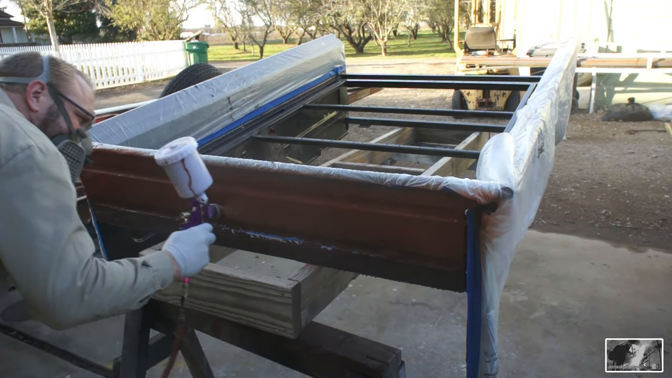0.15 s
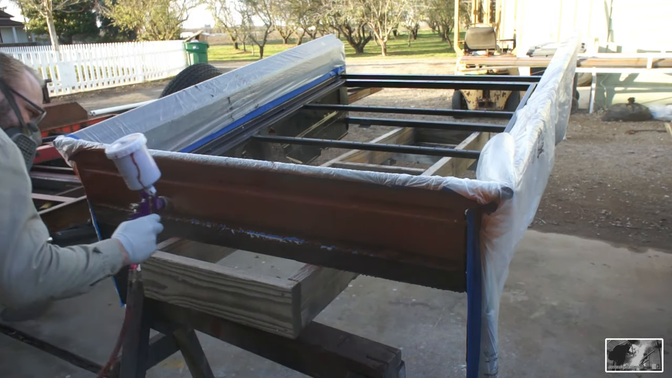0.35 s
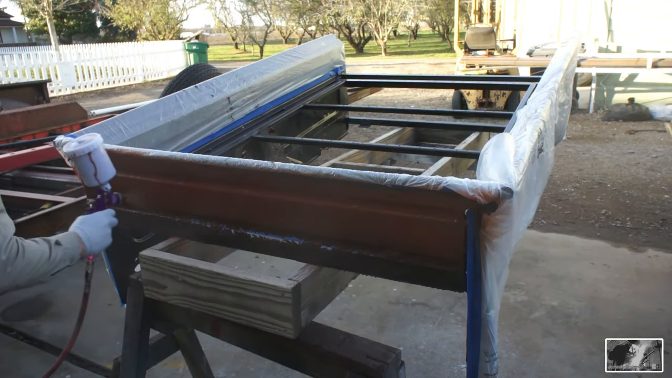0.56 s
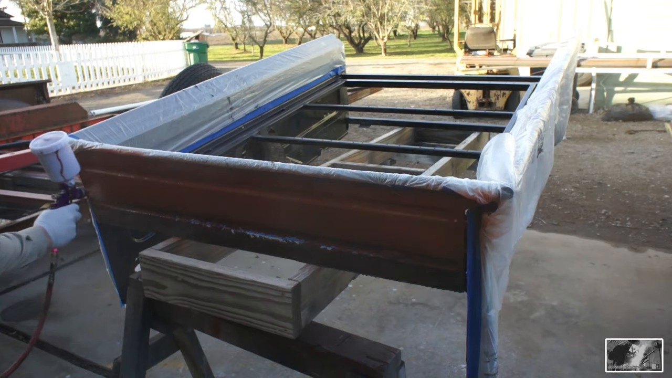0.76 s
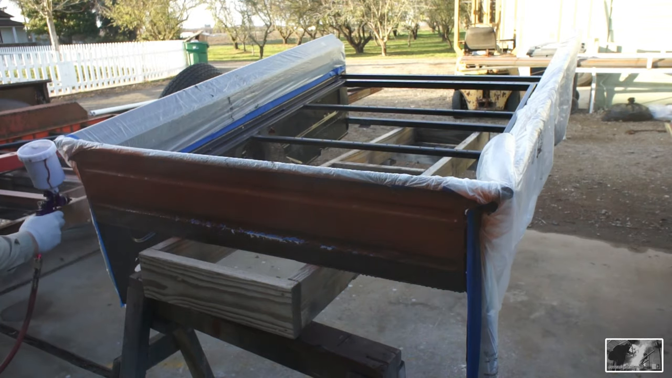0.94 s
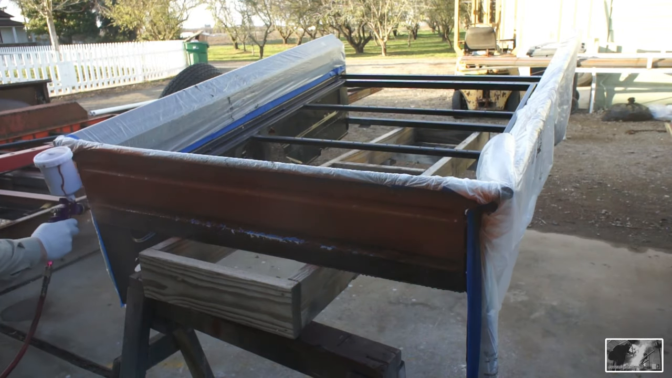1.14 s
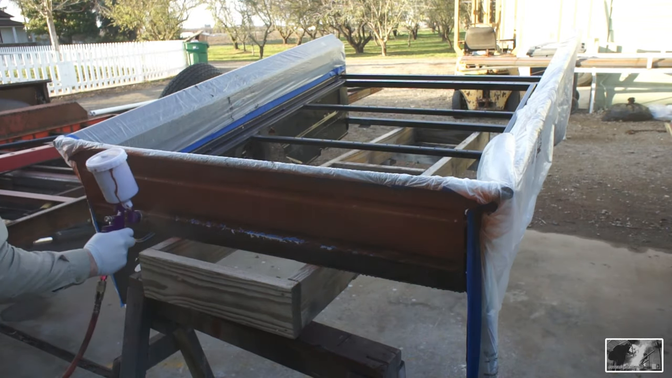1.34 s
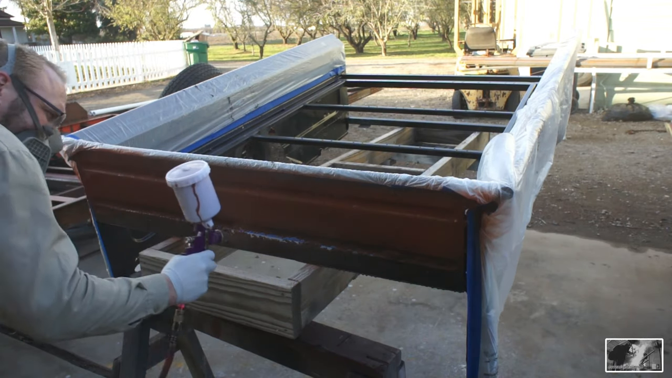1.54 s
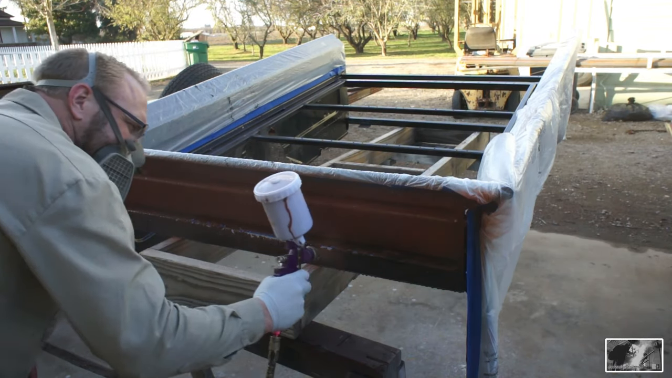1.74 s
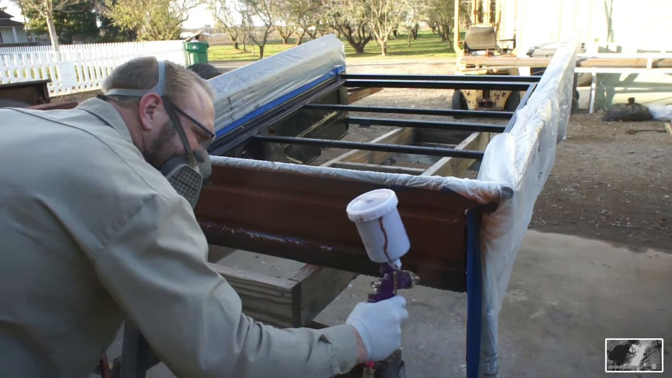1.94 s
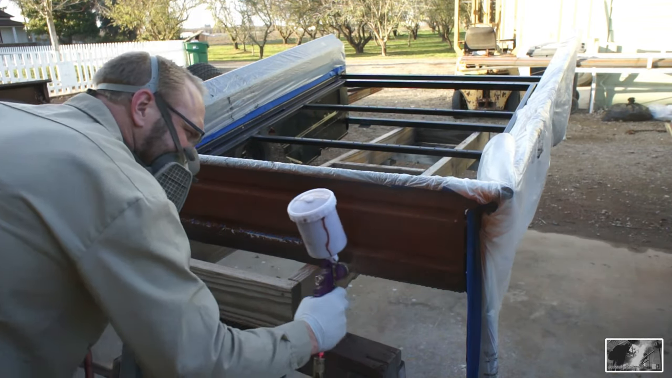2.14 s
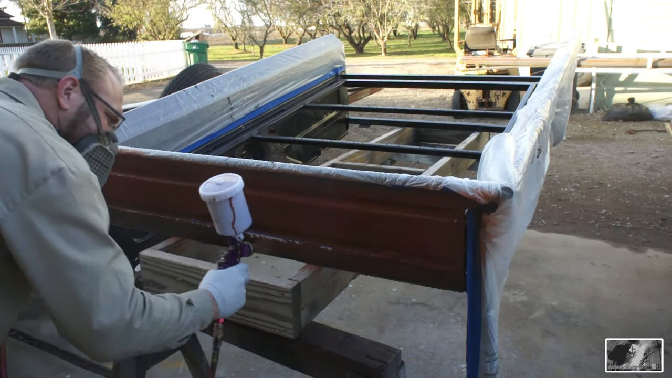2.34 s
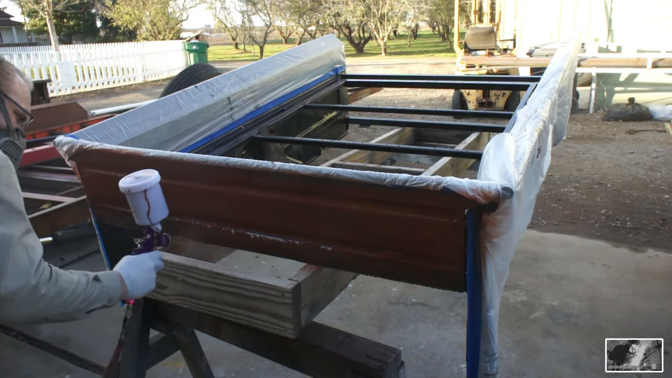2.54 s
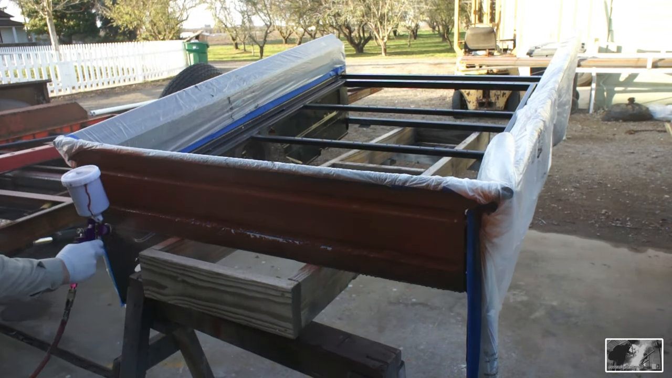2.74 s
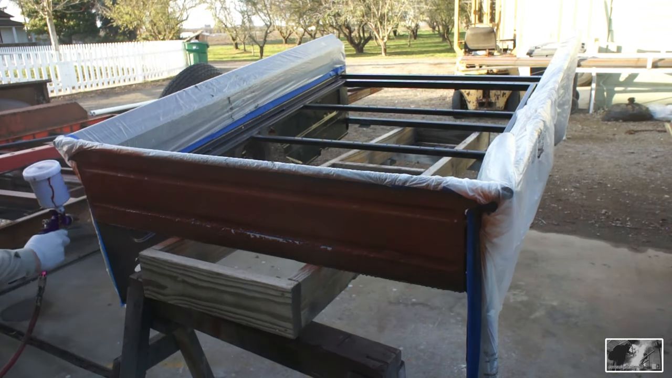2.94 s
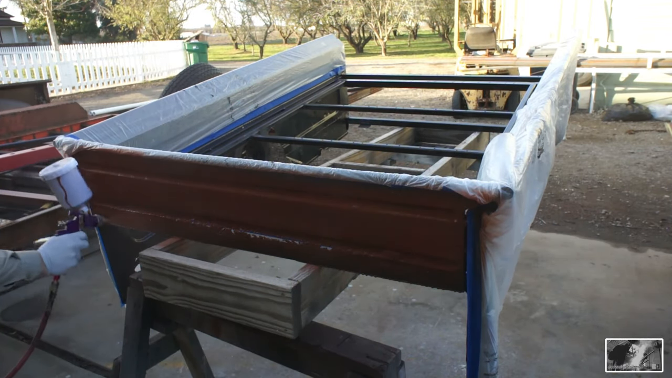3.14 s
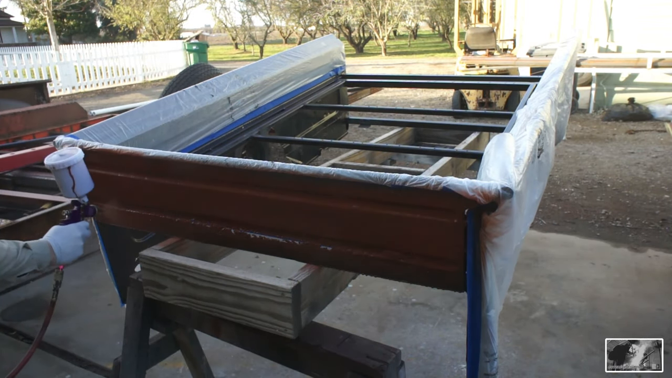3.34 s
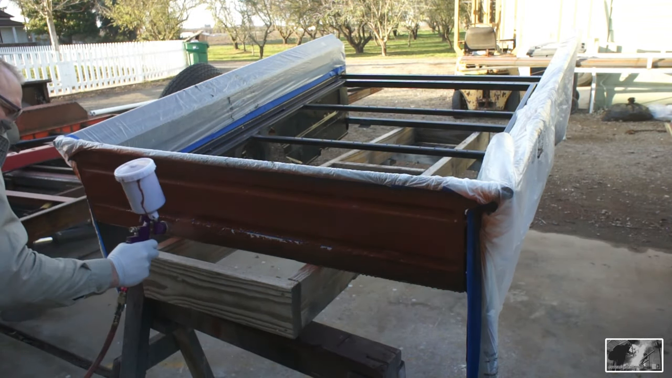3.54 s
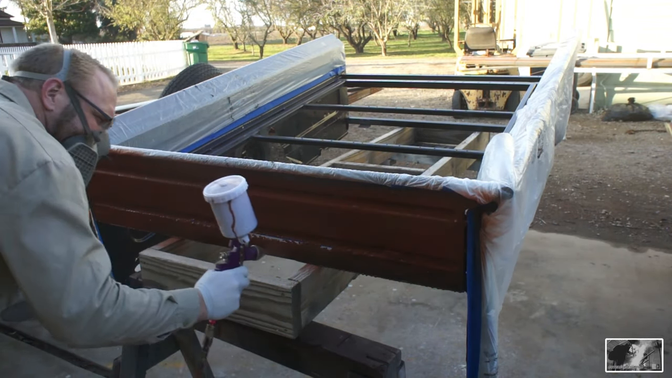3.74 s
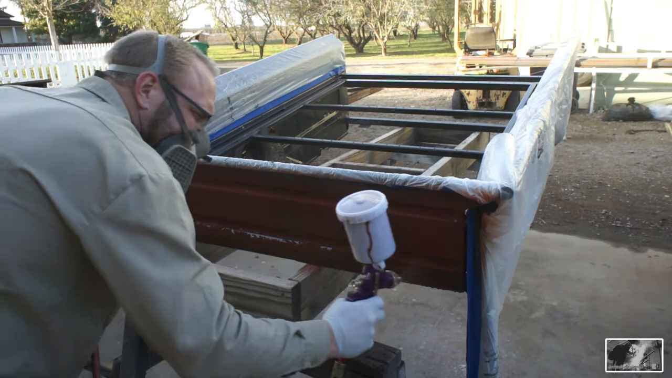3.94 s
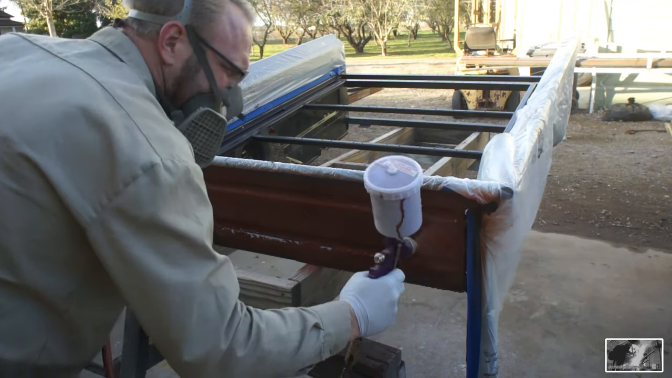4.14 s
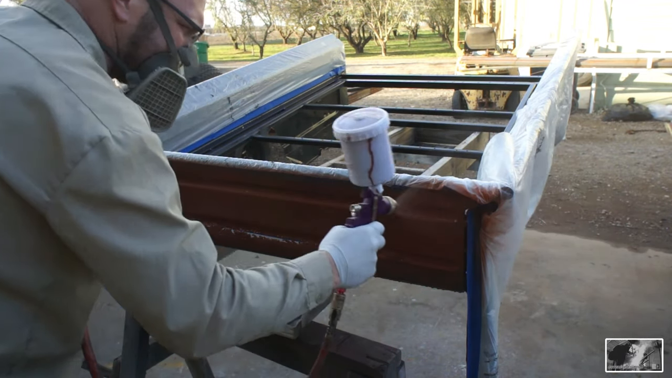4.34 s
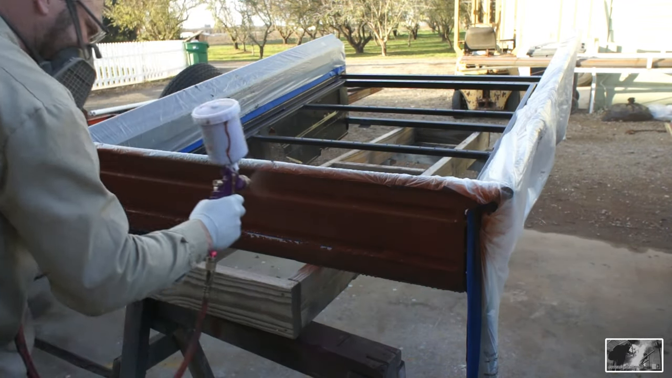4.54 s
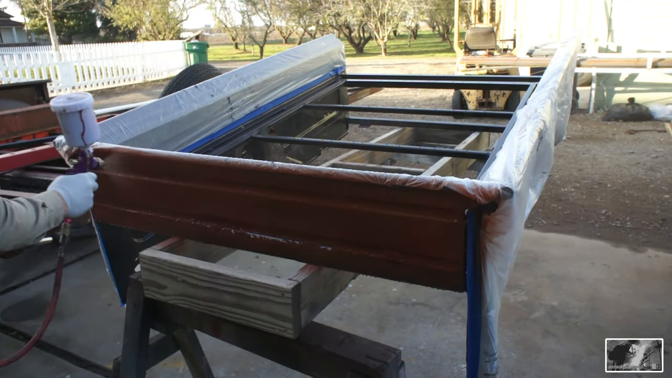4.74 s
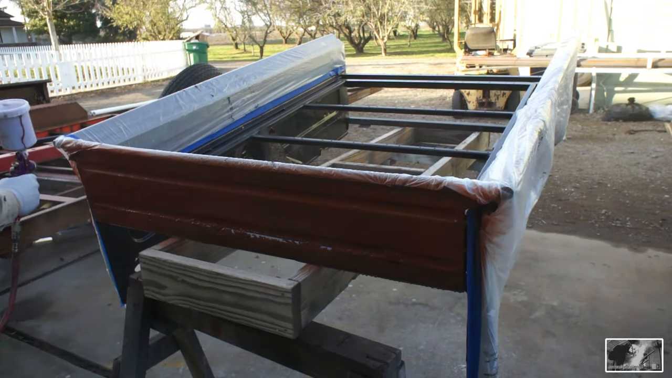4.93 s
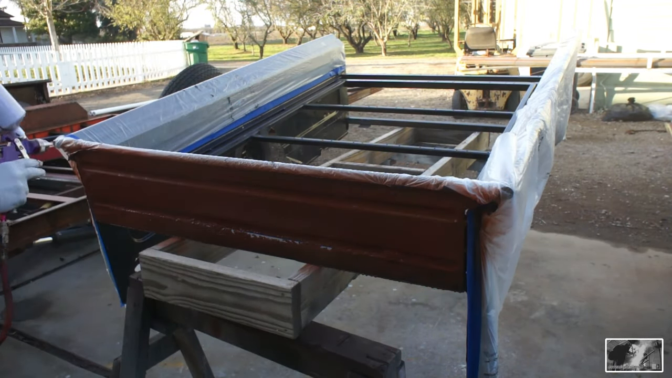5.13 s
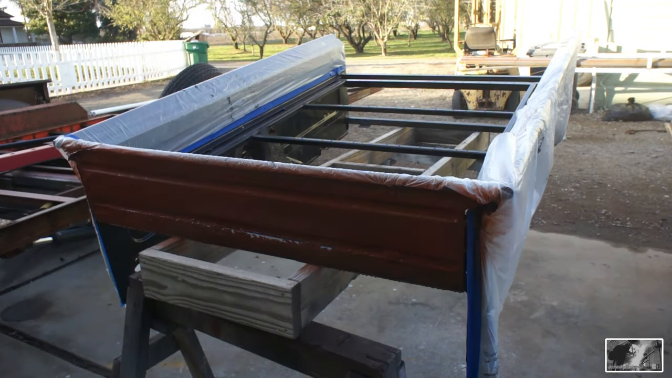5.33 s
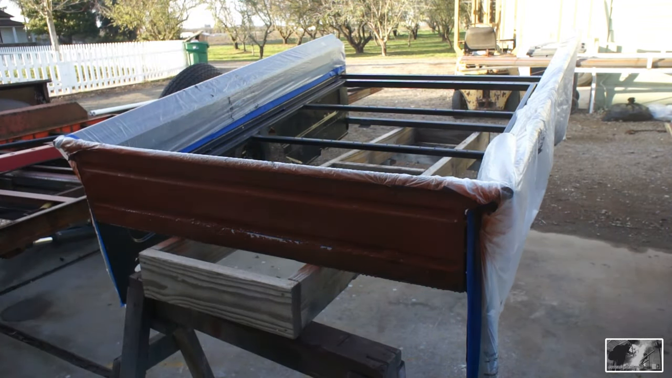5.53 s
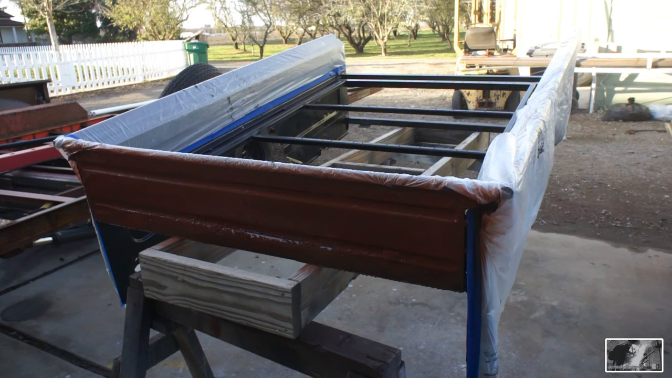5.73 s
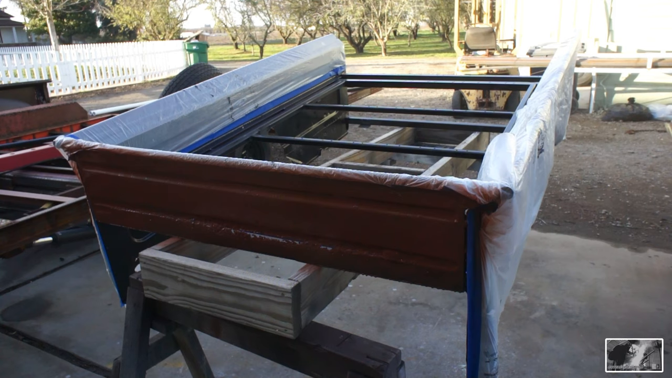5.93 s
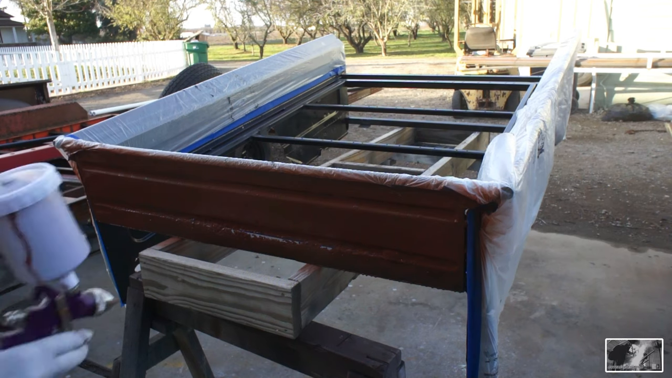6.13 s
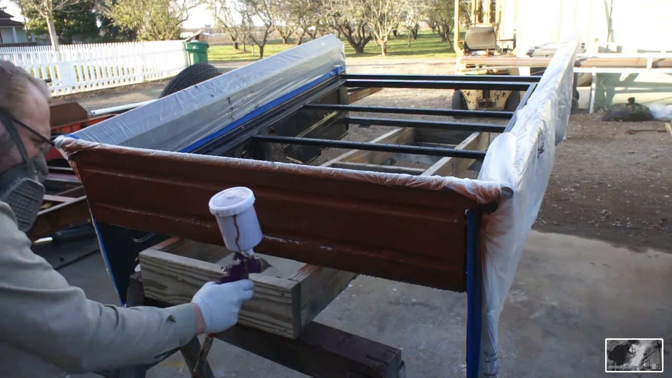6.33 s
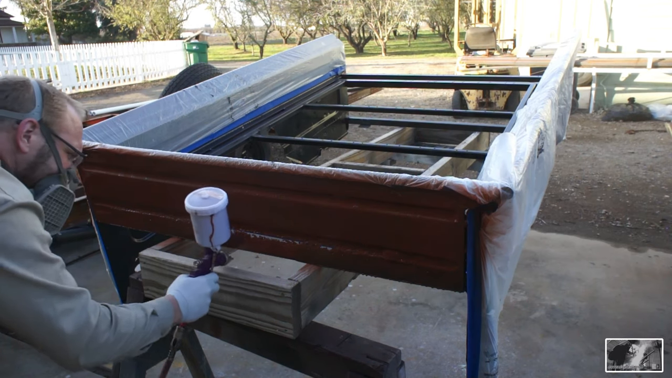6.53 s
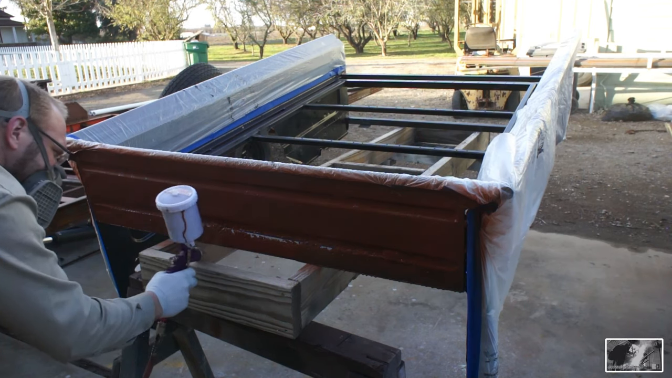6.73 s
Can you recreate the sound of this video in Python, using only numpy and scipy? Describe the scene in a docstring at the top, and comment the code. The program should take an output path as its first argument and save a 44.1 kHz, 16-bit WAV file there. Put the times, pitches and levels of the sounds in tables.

```python
"""Compressed-air spray gun on a steel panel

The gun sweeps to and fro along a trailer panel outdoors: its nozzle hisses as turbulent noise from a moving
point, and the jet roars through the panel's resonances. At first the hiss is fuller, with a low rush; after 1.17 s
it thins abruptly, the rush stops, and a distant piston compressor is heard as a rattle repeated on every turn.
Near the end the trigger is let go, decaying noise and tones make a double clack, and the spray surges back."""
import sys
import numpy as np
from scipy import signal
from scipy.fft import rfft, irfft
from scipy.io import wavfile
from scipy.ndimage import map_coordinates

SR = 44100
rng = np.random.default_rng(int(sys.argv[2]) if len(sys.argv) > 2 else 0)


def unload_audio(sound):
    """Save the sound as a 16-bit wav file, at the path given as the first command line argument."""
    columns = np.transpose(np.atleast_2d(sound))
    # keep every value between -1 and 1, then stretch to whole-number steps
    steps = np.round(np.clip(columns, -1, 1) * 32767)
    wavfile.write(sys.argv[1], SR, steps.astype(np.int16))


N = 298998
T = np.arange(N) / SR
FREQS = np.maximum(np.arange(N // 2 + 1) * SR / N, 1)
LEFT_RIGHT = np.array([[1], [-1]])  # sign of a level difference in each channel
PULL_S = 6.3745  # the trigger is pulled again


def from_db(db):
    """Decibel law: 20 dB is a tenfold amplitude."""
    return 10 ** (np.asarray(db) / 20)


def rms_one(x):
    """Normalisation to unit root mean square."""
    return x / np.sqrt(np.mean(x ** 2) + 1e-20)


def in_time(rows):
    """Linear interpolation of each column after the first, which holds the times in seconds."""
    s, *columns = np.transpose(rows)
    return [np.interp(T, s, c) for c in columns]


def swells(rows):
    """Superposition of Gaussian envelopes, each with a centre, a peak in dB and a standard deviation."""
    return sum(from_db(db) * np.exp(-.5 * ((T - s) / sigma) ** 2) for s, db, sigma in rows)


def ramp(at_s, length_s):
    """Linear rise from 0 to 1, centred on a moment."""
    return np.clip((T - at_s) / length_s + .5, 0, 1)


def response(spectrum):
    """Magnitude response, interpolated in dB over log frequency, with unit mean power."""
    hz, db = np.transpose(spectrum)
    return rms_one(from_db(np.interp(np.log(FREQS), np.log(hz), db)))


def lifted(modes):
    """Modal response: each resonance adds a bell of decibels, and a negative lift makes a hollow."""
    return from_db(sum(db / (1 + (2 * (FREQS - hz) / width) ** 2) for hz, width, db in modes))


def shaped(x, gain):
    """Zero-phase filtering: the spectrum is multiplied by a gain per frequency."""
    return irfft(rfft(x) * gain, N)


def drift(rate_hz):
    """Random modulation: low-passed Gaussian noise of unit rms, with its corner at rate_hz."""
    return rms_one(shaped(rng.standard_normal(N), 1 / (1 + (FREQS / rate_hz) ** 2)))


def delayed(x, seconds, order=3):
    """Propagation delay: the signal is read through a lag that may move."""
    return map_coordinates(x, [np.arange(N) - seconds * SR], order=order, mode="mirror")


def air_noise(spectrum, spread):
    """Partial coherence: both channels share one noise, and each adds its own."""
    noise = shaped(rng.standard_normal((3, N)), response(spectrum))
    return rms_one(noise[0] + spread * noise[1:])


def open_air():
    """Diffuse ambience: low-weighted, weakly coherent noise whose level wanders."""
    # outdoor background spectrum: frequency_hz, relative_db
    outdoor_spectrum = [(20, 3), (60, 1.5), (130, 6.5), (300, 13), (1000, 1.5), (8000, -46)]
    return from_db(-53.0 + 2 * drift(5.4)) * air_noise(outdoor_spectrum, spread=2.7)


def rattle(turns, turn_hz):
    """Periodicity: one random-phase waveform is repeated on every turn and so has a harmonic spectrum."""
    size = int(SR / turn_hz)
    one_turn = rms_one(irfft(np.exp(2j * np.pi * rng.random(size // 2 + 1)), size))
    return np.interp(turns % 1 * size, np.arange(size), one_turn)


def compressor(level_db, knock_db, valve_db, throb, clatter, uneven_db):
    """Periodic excitation of resonances: each turn rattles the tank, knocks on the cylinder head and chuffs."""
    # spectrum of the running compressor: frequency_hz, relative_db
    pump_spectrum = [(30, -30), (100, -32), (190, -26), (300, -1), (600, 1), (1000, 3), (1550, -1),
                     (2300, 0), (2800, -7), (4000, -13.5), (7500, -49), (15000, -36)]
    # resonances and hollows of the tank: frequency_hz, width_hz, lift_db
    tank_modes = [(378, 50, 3), (478, 32, -3.5), (507, 20, 4.8), (544, 20, 5), (585, 36, -1.5),
                  (632, 32, 4), (686, 32, 4), (779, 18, 2), (834, 18, 6), (853, 14, -3), (876, 30, 4),
                  (1020, 24, 4.5), (1051, 20, 5), (1122, 44, 13.6)]
    # spectrum of the air through the valves: frequency_hz, relative_db
    valve_spectrum = [(1200, -21), (1650, -12), (1840, 5.5), (2000, -12), (2150, 6), (2420, -25),
                      (2700, -18), (3200, -23), (8000, -38)]
    turn_hz, stroke_s = 18.14, 5.188  # mean speed, and a moment of peak stroke
    hum_waver = .42
    knock_hz, knock_s, knock_turn = 527, .004, .73  # pitch, time constant, start as a fraction of a turn
    flurry_hz, flurry_at_s, flurry_db = 2.85, 5.55, 2.4  # rate, time of one crest, swing either way

    speed_wander = .0018 * drift(2)
    turns = turn_hz * (T - stroke_s + np.cumsum(speed_wander) / SR)
    # loose parts shift, so the partials waver separately while the sum stays level
    shares = [np.ones(N), hum_waver * drift(2.7), hum_waver * drift(6.6)]
    shaking = sum(share * rattle(turns, turn_hz) for share in shares)
    shaking = shaking / np.linalg.norm(shares, axis=0)
    # the lows repeat faithfully, the highs are new on each turn
    fresh = FREQS ** 2 / (FREQS ** 2 + 1900 ** 2)
    drive = shaped(shaking, np.sqrt(1 - fresh)) + shaped(rng.standard_normal(N), np.sqrt(fresh))
    # each channel adds noise of its own, more in the highs
    drive = drive + shaped(rng.standard_normal((2, N)), 0.25 + 0.18 * FREQS / (FREQS + 6000))
    stroke = np.cos(2 * np.pi * turns)
    beat = 1 + throb * stroke - clatter * np.cos(8 * np.pi * turns)  # once and four times a turn
    beaten = drive * beat * from_db(.5 * drift(8.0))
    tank = rms_one(shaped(beaten, response(pump_spectrum) * lifted(tank_modes)))

    # the knock swells and dies within one turn, harder or softer each time
    age = (turns - knock_turn) % 1 / turn_hz
    swell = age ** 2 * np.exp(-age / knock_s)
    knock = rms_one(swell * np.sin(2 * np.pi * knock_hz * age) * from_db(uneven_db * drift(15)))

    # the valves chuff once a turn, in flurries and with uneven strength
    flurry = np.cos(2 * np.pi * flurry_hz * (T - flurry_at_s))
    chuff = (1 + .7 * stroke) * from_db(flurry_db * flurry + uneven_db * drift(14))
    valves = rms_one(chuff * air_noise(valve_spectrum, spread=0.53))
    return from_db(level_db) * tank + from_db(knock_db) * knock + from_db(valve_db) * valves


def puffs():
    """Low-frequency pressure noise: soft puffs of air on the microphones, weakly coherent between them."""
    # puffs: centre_s, level_db, sigma_s
    puff_times = [(1.355, -37.5, 0.033), (4.08, -44, 0.019), (4.52, -49, 0.022), (4.74, -46.5, 0.037),
                  (5.88, -45, 0.028)]
    # spectrum of a puff: frequency_hz, relative_db
    puff_spectrum = [(20, -13), (120, -3), (220, 11), (430, 12.5), (700, 5), (1100, -16), (4000, -45)]
    pan_db = -1.5  # softer on the left, louder on the right
    return swells(puff_times) * air_noise(puff_spectrum, spread=5.6) * from_db(pan_db * LEFT_RIGHT)


def low_rush(flutter_db):
    """Resonant filtering of flow noise: a steady, hollow rush whose middle swells now and then."""
    # spectrum of the rush: frequency_hz, relative_db
    rush_spectrum = [(20, -14), (70, -8), (130, 0.5), (190, 0.5), (380, 4), (500, -4), (700, -2.5),
                     (1000, -6.5), (2000, -12.5), (4000, -20), (10000, -51)]
    # hollow resonances in the rush: frequency_hz, width_hz, lift_db
    rush_modes = [(189, 26, 5.5), (265, 40, 2), (385.4, 17, 7), (506, 65, 4.5), (652, 23, 6), (740, 33, 6)]
    # swells of the middle: centre_s, level_db, sigma_s
    swell_times = [(.04, -36.5, 0.055), (.27, -38, 0.12), (.99, -36.5, 0.078)]
    # spectrum of the swells: frequency_hz, relative_db
    swell_spectrum = [(150, -25), (400, -1), (700, 6.5), (1000, -6), (2000, -25), (6000, -52)]
    hollow = rms_one(shaped(air_noise(rush_spectrum, spread=0.3), lifted(rush_modes)))
    steady = from_db(-35.5 + flutter_db * drift(32)) * hollow
    return steady + swells(swell_times) * air_noise(swell_spectrum, spread=0.29)


def clacks():
    """Impact and decay: a double clack of bright noise and hollow tone, with faint rebounds, dies exponentially."""
    # contacts: start_s, crack_db, t60_s, dull_above_hz, body_db, body_hz
    contacts = [(5.6217, -24.3, .04, 7000, -33, 520), (5.6296, -20.5, .012, 2400, -16.3, 720),
                (5.6375, -39, .03, 1500, -29, 1150), (5.646, -40, .03, 1200, -31, 900)]
    # spectrum of a crack before it is dulled: frequency_hz, relative_db
    crack_spectrum = [(100, -32), (250, -33), (450, 3), (700, -8), (1400, 0), (2500, -3), (3400, -6),
                      (4200, -2.5), (8800, -11), (9700, -1), (11000, -15), (16000, -12)]
    out = np.zeros((2, N))
    for s, crack_db, t60, dull_hz, body_db, body_hz in contacts:
        age = np.maximum(T - s, 0)
        dulling = signal.butter(1, min(dull_hz, SR / 3), fs=SR, output="sos")
        crack = rms_one(signal.sosfilt(dulling, air_noise(crack_spectrum, spread=0.54)))
        body = -np.sin(2 * np.pi * body_hz * age)
        decay = (T >= s) * from_db(-60 * np.minimum(age / t60, 2))
        out += decay * (from_db(crack_db) * crack + from_db(body_db) * body)
    # so small a thing radiates no bass
    return signal.sosfilt(signal.butter(4, 360, "high", fs=SR, output="sos"), out)


def spurts():
    """Brief turbulent flow: small spurts of air while the gun rests."""
    # spurts: centre_s, level_db, sigma_s
    spurt_times = [(5.822, -37.5, 0.0046), (5.967, -39.5, 0.0082), (6.002, -37, 0.022)]
    # spectrum of a spurt: frequency_hz, relative_db
    spurt_spectrum = [(1500, -25), (3000, 1), (3700, 6), (6500, -4), (9000, -4.5), (16000, -14)]
    return swells(spurt_times) * air_noise(spurt_spectrum, spread=2.4)


def trigger():
    """Valve opening, 0 to 1, as a control of flow: it shuts on release and snaps open on the next pull."""
    shut_s, close_s, open_s = 5.035, .05, .012  # moment fully shut, closing time, opening time
    return 1 - ramp(shut_s - close_s / 2, close_s) + ramp(PULL_S + open_s / 2, open_s)


def panel_roar(grazing, flutter_db, sharpness):
    """Jet impingement: turbulence breaking on steel swells on passes, flares on edges and rings where it strikes."""
    # spectrum of the impact: frequency_hz, relative_db
    impact_spectrum = [(200, -26), (450, -16), (800, -4.5), (1350, -6), (1600, -2.5), (1950, -2.5),
                       (2600, -3.5), (3500, -10.5), (4200, -10.5), (5200, -9.5), (9000, -14.5),
                       (16000, -53)]
    # resonances of the panel and the air gap before it: frequency_hz, width_hz, lift_db
    panel_modes = [(1290, 160, 6.5), (1428, 96, 6), (1880, 200, 5.5), (2075, 60, 5), (3400, 220, 6.5),
                   (4020, 430, 6.5)]
    # short gusts as the jet catches an edge: centre_s, roar_db, sigma_s
    gusts = [(2.0, -39, 0.037), (2.21, -32.5, 0.0079), (2.264, -26, 0.013), (2.33, -25.3, 0.0105),
             (2.403, -34, .006), (2.44, -32.5, .01), (2.476, -31.5, .01), (3.0, -34.5, 0.026),
             (3.615, -29, 0.0082), (3.705, -34, .014), (3.795, -30.5, 0.009), (3.851, -23, 0.01),
             (6.39, -31, 0.01), (6.425, -30, 0.018), (6.527, -33, 0.015)]
    # the jet meets the panel squarely, timed at the middle of each ramp:
    # rise_middle_s, fall_middle_s, roar_db, rise_s, fall_s, ring_hz, ring_lift_db
    passes = [(1.498, 1.827, -36, 0.35, 0.15, 1400, 3.5), (2.247, 2.538, -31.5, 0.08, 0.14, 3080, 2.5),
              (3.605, 3.87, -30, 0.2, 0.1, 1840, 2.5), (3.98, 4.57, -41, 0.061, 0.091, 1790, 0.5),
              (6.373, 6.824, -33.5, .007, 0.42, 1280, 5)]
    graze_db = -44.5  # the jet glancing off the panel between passes
    roar = rms_one(shaped(air_noise(impact_spectrum, spread=0.025), lifted(panel_modes)))
    power = swells(gusts) ** 2 + (grazing * from_db(graze_db)) ** 2
    rings = 0
    for start, end, db, rise, fall, ring_hz, lift_db in passes:
        facing = ramp(start, rise) * (1 - ramp(end, fall))
        power = power + (from_db(db) * facing) ** 2
        ring = signal.lfilter(*signal.iirpeak(ring_hz, sharpness, fs=SR), roar)
        rings = rings + facing * (from_db(lift_db) - 1) * ring
    return trigger() * np.sqrt(power) * from_db(flutter_db * drift(62)) * (roar + rings)


def aim(levels):
    """Flow control of level: the hiss follows the turning gun, sinks to a leak, and surges on reopening."""
    # air leaking from the nozzle while the gun rests: time_s, hiss_db, extra_treble_db
    leak_levels = [(5.05, -41, -4.5), (5.33, -39, -4.5), (5.48, -40.8, -6.5), (5.8, -39.5, -6.5),
                   (6.14, -40, -4.5), (6.35, -43, -8)]
    # pressure stored in the hose makes the restart louder and brighter, then drains away
    surge_db, surge_treble_db, surge_s = 6, 4.5, 0.17  # surge_s is the time constant
    jet_db, treble_db = in_time(levels)
    leak_db, leak_treble_db = in_time(leak_levels)
    valve = trigger()
    surge = (T > PULL_S) * np.exp(-np.abs(T - PULL_S) / surge_s)
    flow = valve * from_db(jet_db + surge_db * surge) + (1 - valve) * from_db(leak_db)
    open_treble_db = treble_db + surge_treble_db * surge
    return 20 * np.log10(flow), valve * open_treble_db + (1 - valve) * leak_treble_db


def reflected(x, across, count=6):
    """Multipath reflection: bounces off the frame and the ground, their path lengths shifting with the sweep."""
    # each path: a lag of 1.5-5 ms and a shift of 0.4-1 ms per unit of place
    paths = rng.uniform([.0015, .0004], [.005, .001], (count, 2))
    moving = across + .15 * drift(1.5)
    bounces = 0
    for k, (lag, shift) in enumerate(paths):
        bounces = bounces + delayed(x, lag + (-1) ** k * shift * moving, order=1)
    return bounces


def nozzle(spectrum, levels, scatter, scatter_aside, bounce, flutter_db, treble_hz, pan_db, lead_s):
    """Turbulent jet noise from a moving point, heard directly and scattered by the trailer and the ground."""
    # sweep of the gun, place 0 in front of the microphones, 1 far left, negative right: time_s, place
    sweep = [(0, 0.077), (.27, 0.19), (.52, 0.37), (.8, 0.51), (1.15, 0.53), (1.42, 0.33), (1.72, 0.093),
             (2.06, -0.3), (2.32, 0.26), (2.85, 0.36), (3.3, 0.59), (3.85, 0.012), (4.12, -0.535),
             (4.45, 0.018), (4.75, 0.56), (5.1, 0.88), (6.15, 0.97), (6.42, 0.15), (6.78, 0.24)]
    # echo of the hiss off the panel just behind the nozzle: time_s, comb_spacing_hz, echo_strength
    panel_echo = [(0, 5200, 0), (1.2, 4770, 0.13), (1.5, 4000, 0.04), (2.2, 4770, 0), (2.55, 6200, 0.06),
                  (3.25, 4900, 0.1), (3.6, 4170, 0.08), (4.25, 6000, 0), (4.5, 5000, 0.14), (5.1, 7150, 0),
                  (6.4, 6440, 0.08), (6.55, 6600, 0.24), (6.7, 8400, 0.1)]
    open_place = .15  # where the hiss reaches the microphones most directly
    hiss_db, treble_db = levels
    across, = in_time(sweep)
    noise = shaped(rng.standard_normal((3, N)), response(spectrum))
    # the nearer microphone hears it first
    half_lead = lead_s * across / 2
    pair = np.array([delayed(noise[0], -half_lead), delayed(noise[0], half_lead)])
    # mostly short waves differ between the closely spaced microphones, the more so as the gun swings aside
    scattered = scatter + scatter_aside * np.abs(across - open_place)
    short_waves = shaped(noise[1:], FREQS / np.hypot(FREQS, 3000))
    hiss = (pair + scattered * short_waves) / np.hypot(1, scattered)
    # the panel's echo interferes with the hiss and swishes as the gap changes
    comb_hz, echo = in_time(panel_echo)
    hiss = np.array([ear + echo * delayed(ear, 1 / comb_hz, order=1) for ear in hiss])
    hiss = rms_one(hiss + bounce * reflected(hiss.mean(axis=0), across))
    treble = shaped(hiss, 1 / (1 + (treble_hz / FREQS) ** 8))
    hiss = hiss + (from_db(treble_db) - 1) * treble
    side_db = pan_db * np.tanh(3 * across) * LEFT_RIGHT
    return hiss * from_db(hiss_db + side_db + flutter_db * drift(17))


def eddies(hiss, patchy_db, rate_hz, count=7):
    """Turbulent spectral fluctuation: overlapping bands of the hiss wander in level independently."""
    spectrum = rfft(hiss)
    centres_hz = np.linspace(2500, 15000, count)
    out = 0
    for share in np.eye(count):
        band = irfft(spectrum * np.interp(FREQS, centres_hz, share), N)
        out = out + band * from_db(patchy_db * drift(rate_hz))
    return out


def spray_hiss(thin):
    """Equal-power crossfade of two jet noises: a fuller hiss gives way to a thinner one."""
    # spectra of the two hisses: frequency_hz, relative_db
    full_spectrum = [(300, -25), (1200, -4), (3000, -5), (6300, -3), (8000, -0.5), (9500, 1.5), (11500, -1),
                     (12400, -4.5), (13300, -25), (16000, -37)]
    thin_spectrum = [(150, -38), (600, -1.5), (1500, -7.5), (3000, -1.5), (5000, -3.5), (8000, -2),
                     (9500, -4.5), (12000, -2), (14000, -2.5), (16000, -1.5)]
    # swells and dips as the gun turns: time_s, hiss_db, extra_treble_db
    full_levels = [(0, -23.5, -2.5), (.3, -23, 2.5), (.6, -24, -0.5), (1.0, -25, -11), (1.16, -26, -11)]
    thin_levels = [(1.2, -30, -1), (1.45, -30, 4), (1.85, -29.3, 4), (2.1, -30, 1.8), (2.55, -28, 0.5),
                   (2.88, -29.5, 0.2), (3.0, -29, 2), (3.1, -29.5, 0.5), (3.4, -30.5, 0.8),
                   (3.62, -28.5, 1.7), (3.95, -28, 1), (4.11, -31, 2), (4.28, -29.5, 1.5), (4.55, -30, 0.7),
                   (4.8, -30.5, 0.5), (5.02, -34.5, 1.5), (6.42, -29.5, 1.5), (6.78, -30.5, 3.5)]
    full_hiss = nozzle(full_spectrum, aim(full_levels), scatter=0.81, scatter_aside=0.091, bounce=0.087,
                       flutter_db=0.43, treble_hz=10600, pan_db=2.0, lead_s=0.00011)
    thin_hiss = nozzle(thin_spectrum, aim(thin_levels), scatter=0.84, scatter_aside=0.73, bounce=0.18,
                       flutter_db=0.5, treble_hz=8700, pan_db=1.0, lead_s=.000047)
    return eddies(np.sqrt(1 - thin) * full_hiss + np.sqrt(thin) * thin_hiss, patchy_db=0.8, rate_hz=15)


def scene():
    """Superposition of the open air, compressor, puffs, rush, clacks and gun."""
    thin = ramp(1.168, .01)  # 0 while the sound is full, 1 once it has thinned
    pump = compressor(level_db=-37.5, knock_db=-51.5, valve_db=-46.0, throb=.05, clatter=.06, uneven_db=1.6)
    background = open_air() + thin * pump + puffs()
    rush = (1 - thin) * low_rush(flutter_db=0.9)
    gun = spurts() + panel_roar(thin, flutter_db=1.3, sharpness=3.8) + spray_hiss(thin)
    return background + rush + clacks() + gun


def record(dry):
    """Band limiting: the top falls steeply to nothing over the 100 Hz below the cutoff."""
    cutoff_hz = 15860
    return shaped(dry, np.clip((cutoff_hz - FREQS) / 100, 0, 1))


dry = scene()
out = record(dry)
unload_audio(out)
```